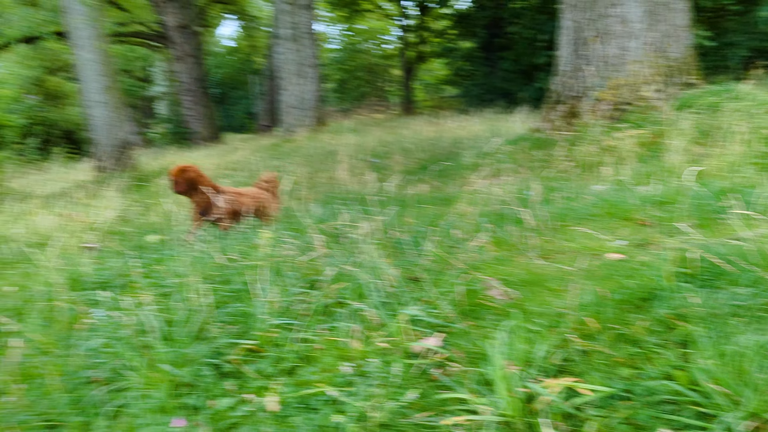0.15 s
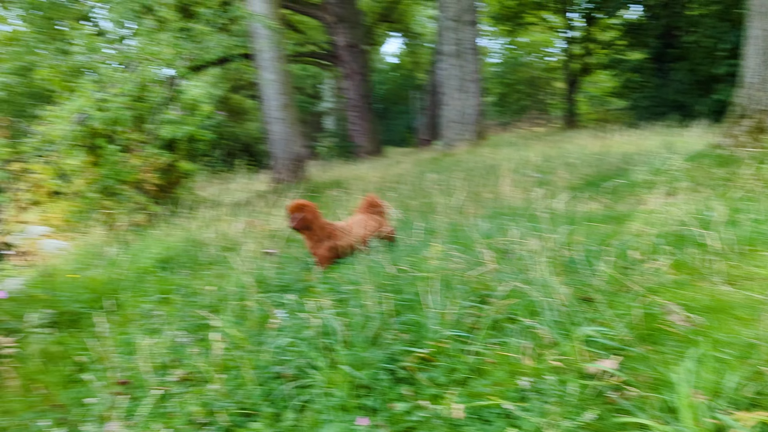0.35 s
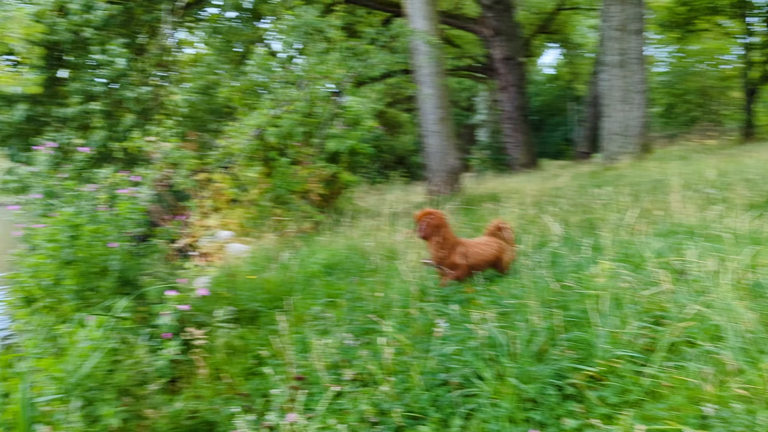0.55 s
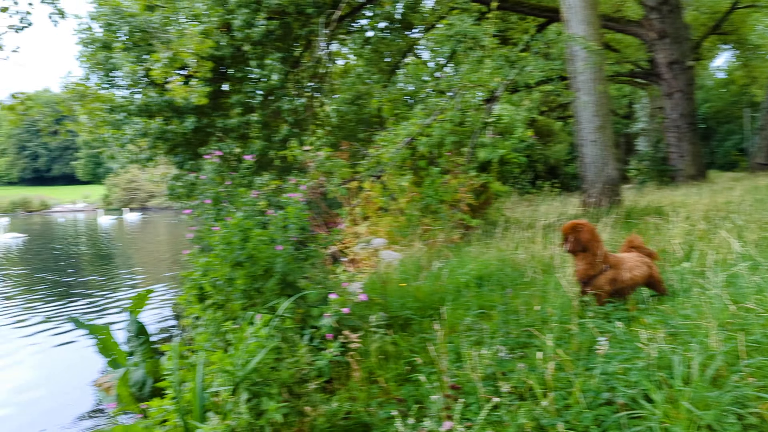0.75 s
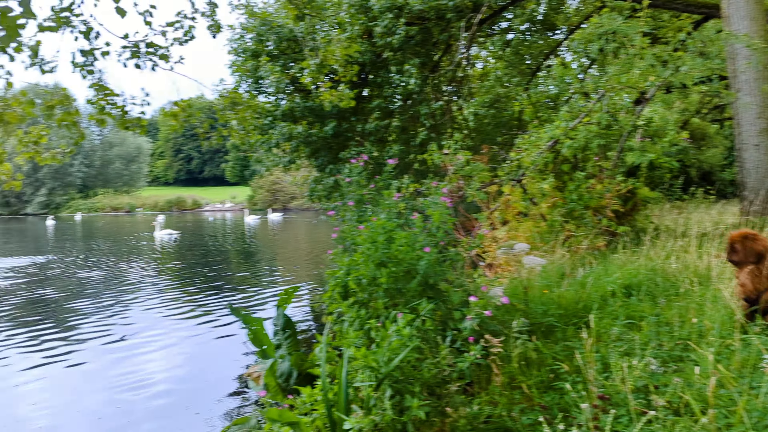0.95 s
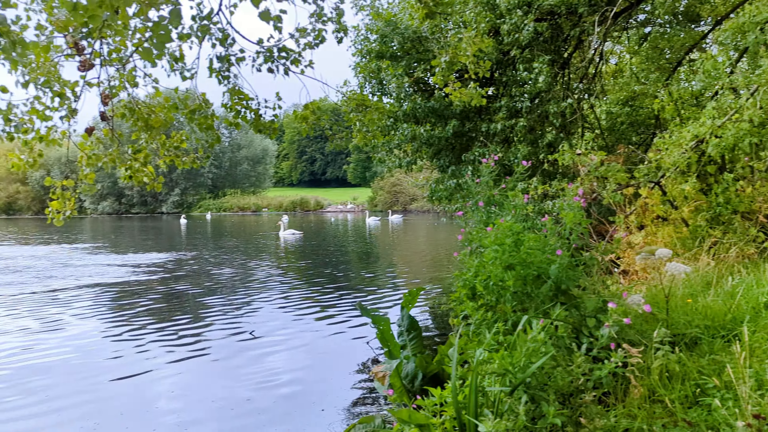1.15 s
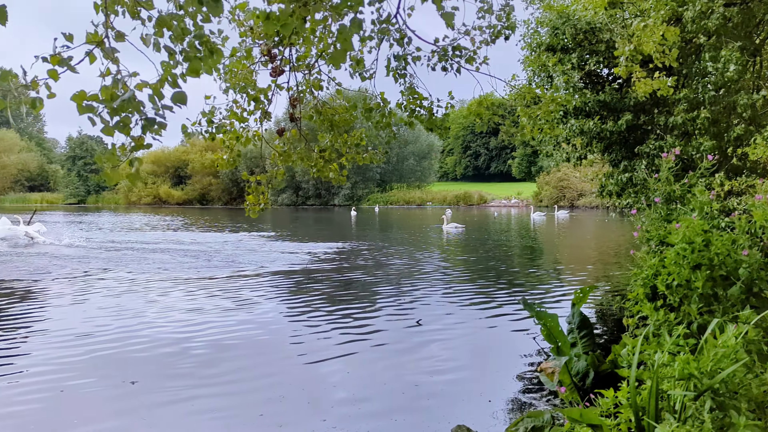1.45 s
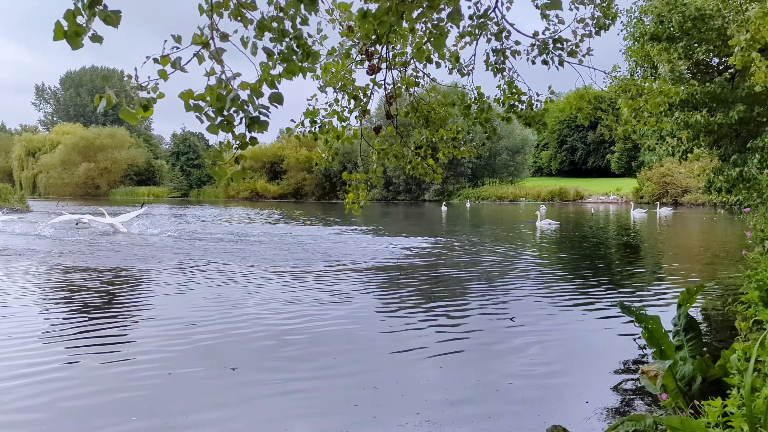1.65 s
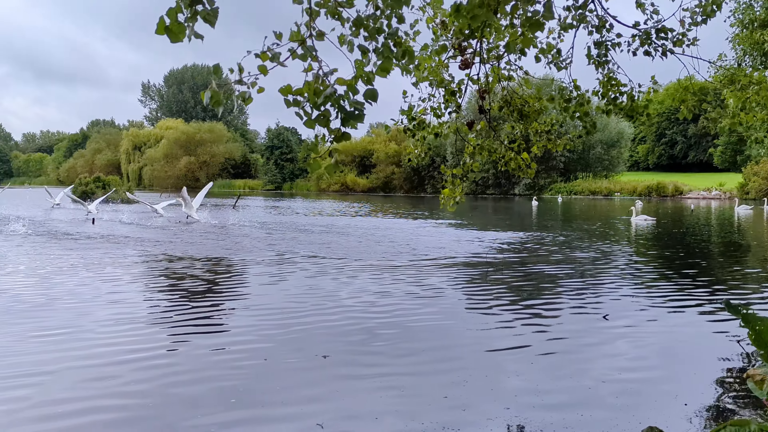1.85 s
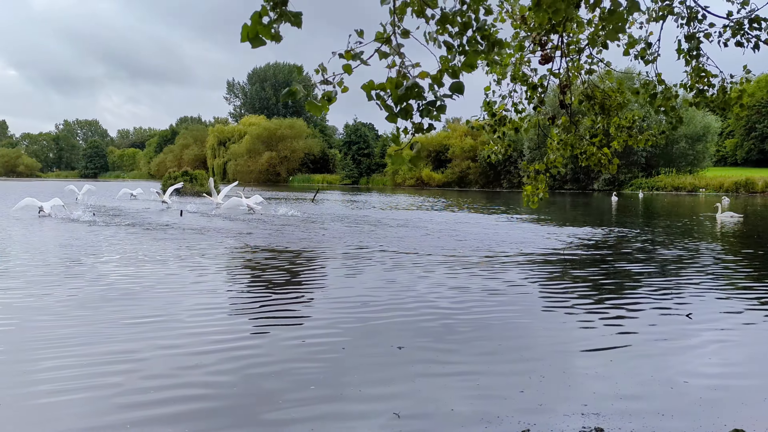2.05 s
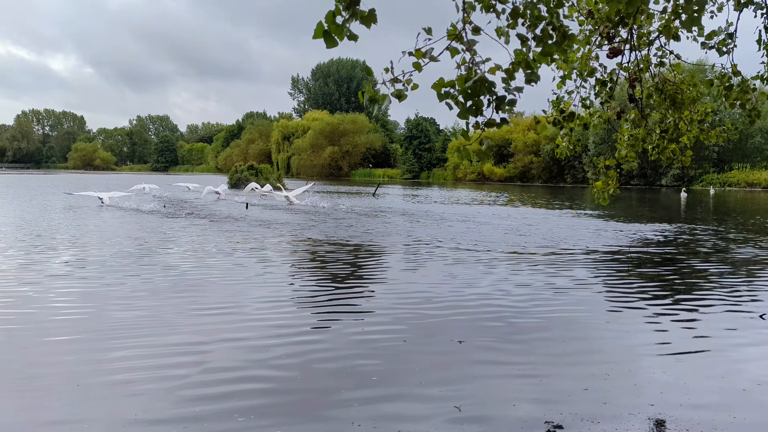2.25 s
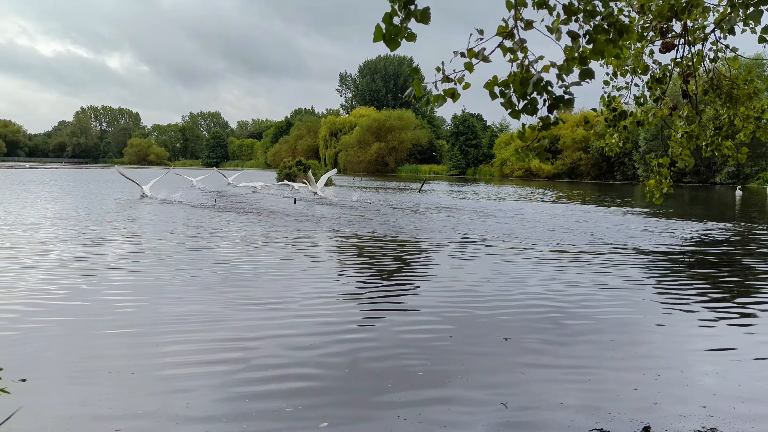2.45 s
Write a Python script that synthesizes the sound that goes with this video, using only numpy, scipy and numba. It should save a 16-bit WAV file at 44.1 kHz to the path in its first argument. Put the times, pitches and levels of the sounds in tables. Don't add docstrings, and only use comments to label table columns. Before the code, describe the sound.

Swans slap the water with feet and wings throughout, in rapid uneven cracks with hollow plops, fine spray and soft shore echo. Wind rumbles close on a handheld stereo phone, thumping hard on the left around 0.4-0.9 s, then both sides near 1.05 s. The strongest slap comes near 1.5 s; wind eases while slaps, faint wing hum and water hiss continue, drifting rightward until 2.6 s.

```python
import sys
import numpy as np
from scipy import signal
from scipy.fft import rfft, irfft
from scipy.io import wavfile
from scipy.ndimage import uniform_filter1d, map_coordinates
from numba import njit

SR = 44100
rng = np.random.default_rng(int(sys.argv[2]) if len(sys.argv) > 2 else 0)


def invert_db(level):
    return 10 ** (np.asarray(level, dtype=float) / 20)


def generate_wav(signal):
    frames = np.transpose(np.atleast_2d(signal))
    scaled = np.clip(frames, -1, 1) * 32767
    pcm = np.round(scaled).astype(np.int16)
    wavfile.write(sys.argv[1], SR, pcm)


N = 114660

# (time [s], peak level [dB], crack pitch [Hz], plop over crack [dB], sizzle over crack [dB])
EARLY_SLAPS = [(0.1116, -21, 2090, -29, -13), (0.3606, -30.5, 1920, 3.5, -17),
               (0.399, -20.5, 1920, -33, -14), (0.4529, -24, 2120, -13, -13),
               (0.5352, -21, 3280, -8.5, -16), (0.6419, -23, 1880, -23, -21),
               (0.6744, -21, 1920, -1.5, -12.5), (0.7657, -26.5, 2450, 2.5, -15),
               (0.8235, -23.5, 1850, 2, -16.5), (0.8442, -24, 1990, -2, -12),
               (0.9248, -19.5, 4530, -2.5, -11.5), (1.0276, -26, 2560, -2.5, -13),
               (1.0879, -17, 3200, -6.5, -23), (1.1253, -24, 1900, -8, -15),
               (1.2077, -18.5, 4250, -12.5, -42), (1.3498, -17.5, 1970, -13.5, -15),
               (1.4117, -26, 1960, -5, -14)]
MIDDLE_SLAPS = [(1.4793, -12, 1730, -9.5, -19.5), (1.577, -20, 2230, -2, -18),
                (1.6171, -23.5, 2070, -13, -17.5), (1.6904, -23, 1740, -4.5, -42),
                (1.721, -36, 1640, -8, -15), (1.7374, -23, 2780, -1.5, -9), (1.7436, -20, 1990, -4, -31),
                (1.7559, -19, 2450, -3.5, -19), (1.8453, -21, 1620, -10, -19),
                (1.8851, -27, 1600, -16, -15), (1.9662, -22, 2470, -1, -26), (2.0135, -23.5, 1600, -1, -24),
                (2.032, -22.5, 2450, -5.5, -29), (2.0552, -25.5, 2530, -5, -9.5)]
LATE_SLAPS = [
    (2.1201, -25, 1700, 1, -18),
    (2.2443, -17.5, 3000, -7.5, -22),
    (2.2777, -22.5, 4160, -7, -38),
    (2.3047, -20.5, 1630, -2.5, -20),
    (2.3915, -28.5, 1800, -2, -21),
    (2.4314, -22.5, 1630, -8, -31),
    (2.5107, -23, 2150, -23, -29),
    (2.5285, -18.5, 1760, -26, -46),
    (2.5494, -24, 1760, -7.5, -18),
    (2.581, -24, 1690, 1.5, -18),
]
# (time [s], peak level [dB], pitch [Hz])
LONE_PLOPS = [
    (0.579, -22.5, 790),
    (1.267, -22.5, 640),
    (1.555, -24, 620),
    (1.601, -24.5, 860),
    (2.22, -39, 740),
    (2.336, -56, 668),
    (2.359, -34, 640),
    (2.485, -28.5, 689),
    (2.507, -34, 751),
]
# (time [s], level [dB])
FLOCK_LEVEL = [(0, -48.5), (.25, -47.5), (.9, -46.5), (1.8, -47), (2.6, -49.5)]
# (frequency [Hz], level per Hz [dB])
CHURN_COLOUR = [(100, 4), (280, -5), (770, -6), (1130, -11), (2400, -11), (6200, -17), (9300, -17.5),
                (13500, -34.5)]
# (frequency [Hz], level [dB])
DISTANCE_LOSS = [(850, 0), (1150, -4), (1600, -1), (5000, 1), (9800, -1.5), (12500, -16), (16000, -24)]
# (frequency [Hz], likeness [0-1])
LEFT_RIGHT_LIKENESS = [(100, 1), (500, 1), (1400, 0.85), (3100, 0.49), (6800, 0.27), (14000, 0.02)]
# (frequency [Hz], left minus right [dB])
PORT_COLOUR = [(200, 1), (1300, -1), (4400, 0), (6200, 3), (8600, 11), (11000, 5), (15000, 2)]
# (left minus right at the start [dB], at the end [dB])
TURN_BALANCE = (0.2, -4)
# (time [s], gust level [dB], left minus right [dB])
GUSTS = [(0, -40, 2), (.3, -34, 7.5), (.37, -28, 14), (.42, -36.5, 1.5), (.48, -22.5, 13), (.58, -34, 6.5),
         (.63, -26, 14), (.76, -25.5, 12), (.88, -26, 8.5), (.95, -37, 3), (1.05, -31.5, 3), (1.1, -34, -3),
         (1.28, -34.5, 8), (1.36, -44.5, 3.5), (1.7, -46, 4), (2.1, -41.5, 3), (2.28, -35.5, 0.5),
         (2.38, -53, 7)]
# (time [s], peak level [dB], port [0 left, 1 right])
EDDY_THUMPS = [(0.377, -8.5, 0), (0.382, -2, 0), (0.477, -7.5, 0), (.492, -8, 0), (0.51, -19, 0),
               (0.59, -11, 0), (.66, -12, 0), (.842, -13, 0), (0.489, -18, 1), (0.851, -12.5, 1),
               (1.05, -11.5, 1)]


def curve(table, x, col=1, log=False):
    a = np.array(table, float)
    if log:
        return np.interp(np.log(x + 1), np.log(a[:, 0] + 1), a[:, col])
    return np.interp(x, a[:, 0], a[:, col])


def unit(x):
    return x / np.sqrt(np.mean(x ** 2))


@njit
def moving_filter(x, hz, damping):
    out, band_state, low_state = np.empty((2, len(x))), 0., 0.
    for i in range(len(x)):
        g = np.tan(np.pi * hz[i] / SR)
        v = (band_state + g * (x[i] - low_state)) / (1 + g * (g + damping))
        out[0, i] = damping * v
        out[1, i] = low_state + g * v
        band_state, low_state = 2 * v - band_state, low_state + 2 * g * v
    return out


def band(x, hz, width):
    return moving_filter(x, np.full(len(x), min(hz, .45 * SR) * 1.), width * 1.)[0]


def shape(x, db):
    return irfft(rfft(x) * invert_db(db(np.fft.rfftfreq(N, 1 / SR))), N)


def walk(rate):
    hold = int(SR / rate)
    steps = np.repeat(rng.standard_normal(N // hold + 1), hold)
    return 1.61 * uniform_filter1d(uniform_filter1d(steps, hold), hold)[:N]


def add(out, s, x):
    i = int(s * SR)
    out[i:i + len(x)] += x[:max(len(out) - i, 0)]


def plop(hz, t):
    t60_s, rise_s = 0.019, 0.0002
    return np.sin(2 * np.pi * hz * t * (1 + 4 * t)) * invert_db(-60 * t / t60_s) * (1 - np.exp(-t / rise_s))


def slap(hz, plop_db, sizzle_db, chance):
    late_s, mirror_s, mirror_db = 0.0011, 0.0023, -6.5
    spray_db, spray_t60_s, grain_db = -29, 0.052, 3
    mist_db, mist_t60_s, sizzle_hz = -23.5, 0.075, 8100
    crack_width, ring_width, ring_db = 1.74, .25, -13
    t = np.arange(4000) / SR

    kick = np.zeros(len(t))
    add(kick, late_s, np.ones(1))
    add(kick, late_s + mirror_s * (1 + .15 * chance[0]), invert_db(np.array([mirror_db + 4 * chance[1]])))

    drop_size = invert_db(grain_db * rng.exponential(size=len(t)))
    drops = rng.standard_normal(len(t)) * drop_size * (t > late_s / 2)
    spray = invert_db(spray_db - 60 * t / spray_t60_s) * drops
    mist = invert_db(mist_db - 60 * t / mist_t60_s) * drops

    crack = band(band(kick + spray, hz, crack_width), hz, 2 * crack_width)
    ring = band(crack, hz, ring_width)
    crack = crack + invert_db(ring_db) * ring * np.abs(crack).max() / np.abs(ring).max()
    crack = crack / np.abs(crack).max()
    sizzle = band(band(kick + mist, sizzle_hz, 1.07), sizzle_hz, 1.33)
    sizzle = sizzle / np.abs(sizzle).max()

    out = invert_db(3.5) * (crack + invert_db(9 + sizzle_db) * sizzle)
    hollow = plop(740 * (1 + .08 * chance[3]), t)
    add(out, late_s, invert_db(plop_db + 1) * hollow)
    return out


def patter():
    count, per_s, level_db, spread_db = 260, 70, -36, 3
    out = np.zeros(N)
    for place, chance in zip(rng.random((count, 2)), rng.standard_normal((count, 4))):
        s = place[0] * count / per_s
        if s < N / SR:
            db = level_db + spread_db * np.clip(chance[2], -2, 2)
            add(out, s, invert_db(db) * slap(1500 * 3 ** place[1], -1.5, -22, chance))
    return out


def slaps():
    out = np.zeros(N)
    rows = list(EARLY_SLAPS) + list(MIDDLE_SLAPS) + list(LATE_SLAPS)
    for (s, db, hz, plop_db, sizzle_db), chance in zip(rows, rng.standard_normal((len(rows), 4))):
        add(out, s, invert_db(db) * slap(hz, plop_db, sizzle_db, chance))
    for s, db, hz in LONE_PLOPS:
        add(out, s, invert_db(db) * plop(hz, np.arange(2000) / SR))
    return shape(out + patter(), lambda f: curve(DISTANCE_LOSS, f, log=True))


def pair(x, y):
    def share(sign):
        likeness = lambda f: np.clip(curve(LEFT_RIGHT_LIKENESS, f, log=True), 0, .99)
        return lambda f: 10 * np.log10((1 + sign * likeness(f)) / 2)
    mid, side = shape(x, share(1)), shape(y, share(-1))
    return np.array([mid + side, mid - side])


def echo(hits, t, t60_s, late_s):
    tail = rng.standard_normal(N) * invert_db(-60 * t / t60_s) * (t >= late_s)
    return signal.fftconvolve(hits, unit(tail) / np.sqrt(N))[:N]


def slaps_on_lake(t):
    hits = slaps()
    direct = pair(hits, invert_db(-5) * echo(hits, t, 0.0018, 0))
    shore = pair(echo(hits, t, 0.16, 0.0014), echo(hits, t, 0.16, 0.0014))
    return direct + invert_db(-17) * shore


def wing_hum(t):
    beat_hz, beat_db, flicker_db = 3.724, 4.5, 2
    beat = beat_db * np.cos(2 * np.pi * beat_hz * (t - 1.5))
    throb = invert_db(curve(FLOCK_LEVEL, t) + 47.5 + beat + flicker_db * walk(29.61))
    out = np.zeros((2, N))
    for hz, width_hz, db in ((734, 404, -50), (1620, 67, -60)):
        width = width_hz / hz
        hum = [unit(band(band(v, hz, width), hz, 0.97 * width)) for v in rng.standard_normal((2, N))]
        out = out + invert_db(db) * throb * np.array(hum)
    return pair(*out)


def churned_water(t):
    flicker_db, level_db = 1, 0.5
    out, swell = np.zeros((2, N)), walk(6.3)
    for hz in 100 * 2 ** np.arange(0, 7.6, .5):
        gain = invert_db(flicker_db * (swell / 2 + walk(24.66)))
        out = out + gain * np.array([band(v, hz, 0.49) for v in rng.standard_normal((2, N))])
    out = shape(out, lambda f: curve(CHURN_COLOUR, f, log=True))
    loudness = np.sqrt(np.mean(band(out[0], 3200, 0.94) ** 2))
    return pair(*(out / loudness * invert_db(level_db + curve(FLOCK_LEVEL, t))))


def turning_phone(lake, t):
    turn_db = np.interp(t, [0, N / SR], TURN_BALANCE) / 2
    lead_s = np.interp(t, [0, N / SR], (.00006, -0.000024)) / 2
    out = []
    for v, sign in zip(lake, (1, -1)):
        port = shape(v, lambda f: sign * curve(PORT_COLOUR, f, log=True) / 2) * invert_db(sign * turn_db)
        out.append(map_coordinates(port, [(t + sign * lead_s) * SR], order=5, mode="mirror"))
    return np.array(out)


def buffeting(gust_db):
    flicker_db, skew, deep_hz = 2, .12, 29.6
    hz = np.clip(65 + 0.76 * (gust_db + 30), 25, 200)
    a, b, c = rng.standard_normal((3, N))
    rumble = unit(moving_filter(moving_filter(a, hz, 1.1)[0], 2 * hz, 1.42)[1] / np.sqrt(hz))
    edge_hz = 2.3 * hz
    edge = unit(moving_filter(moving_filter(b, edge_hz, 0.65)[0], edge_hz, 1.9)[0])
    x = rumble + invert_db(-15 + 2 * flicker_db * walk(25.09)) * edge
    x = x + skew * (x ** 2 - 1)
    deep = unit(band(band(c, deep_hz, 1.06), deep_hz, 1.36))
    deep_db = -41.5 + 0.84 * (gust_db + 42)
    return invert_db(gust_db + flicker_db * walk(18.26)) * x, invert_db(deep_db) * deep


def wind(t):
    eddy_s = .0013
    out = np.zeros((2, N))
    for port, sign in enumerate((1, -1)):
        gust_db = curve(GUSTS, t) + sign * curve(GUSTS, t, 2) / 2
        rough, deep = buffeting(gust_db)
        out[port] = sign * rough + deep
    bump = np.arange(-600, 2400) / SR
    push = np.exp(-(bump / eddy_s) ** 2)
    pull = 0.58 * np.exp(-((bump - 4 * eddy_s) / (5 * eddy_s)) ** 2)
    for s, peak_db, side in EDDY_THUMPS:
        port = int(side > .5)
        add(out[port], s + bump[0], (-1) ** port * invert_db(peak_db) * (push - pull))
    return out


def scene():
    t = np.arange(N) / SR
    lake = slaps_on_lake(t) + wing_hum(t) + churned_water(t)
    return turning_phone(lake, t) + wind(t)


def low_pass(x):
    return signal.sosfilt(signal.butter(12, 15830, fs=SR, output="sos"), x)


def record(dry):
    low_cut_hz, top_hz = 11.1, 15830
    bass_cut = signal.butter(2, low_cut_hz, "high", fs=SR, output="sos")
    mix = shape(signal.sosfilt(bass_cut, dry), lambda f: -90. * (f > top_hz))
    return low_pass(mix)


dry = scene()
out = record(dry)
generate_wav(out)
```